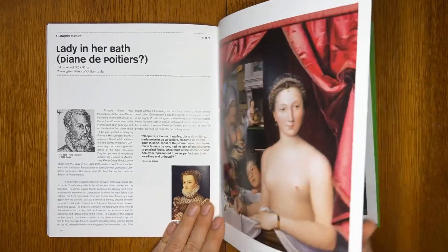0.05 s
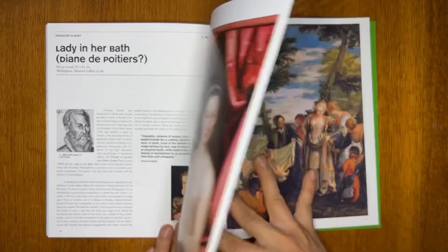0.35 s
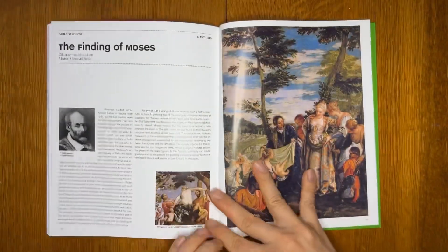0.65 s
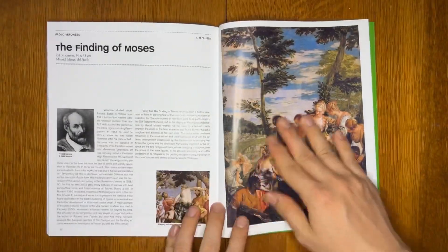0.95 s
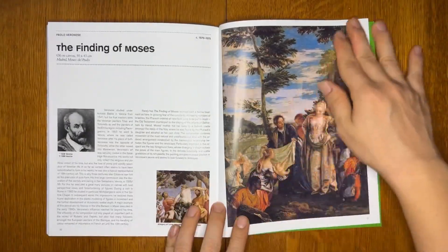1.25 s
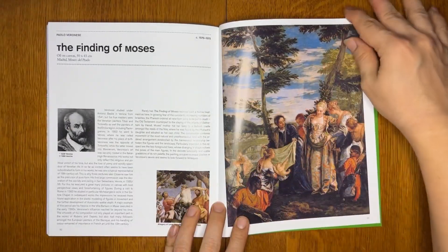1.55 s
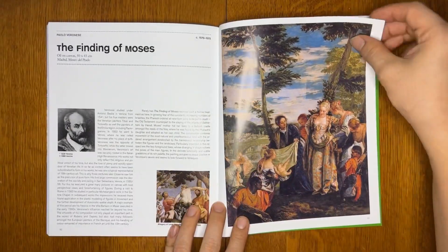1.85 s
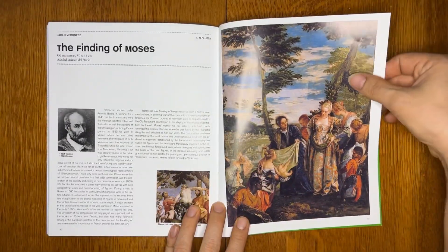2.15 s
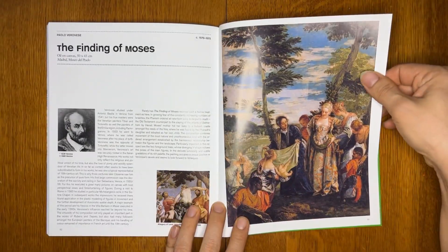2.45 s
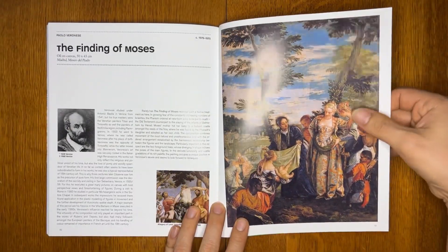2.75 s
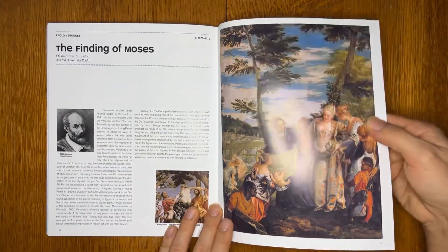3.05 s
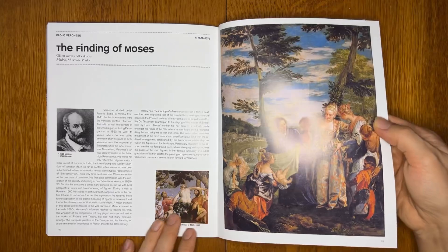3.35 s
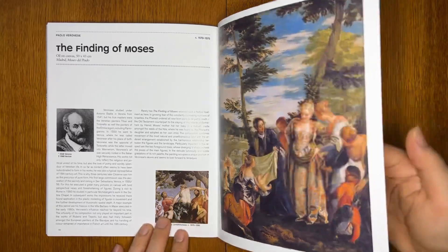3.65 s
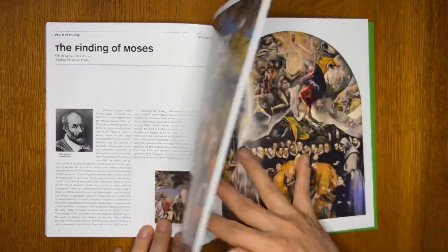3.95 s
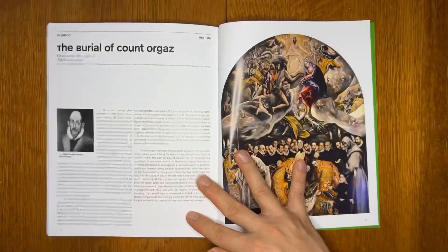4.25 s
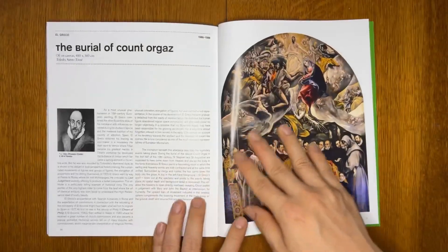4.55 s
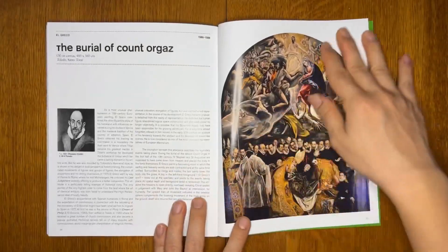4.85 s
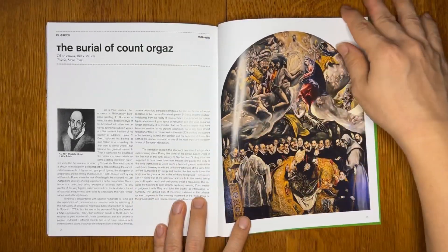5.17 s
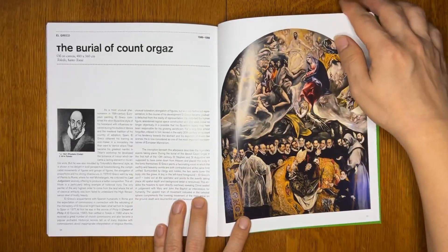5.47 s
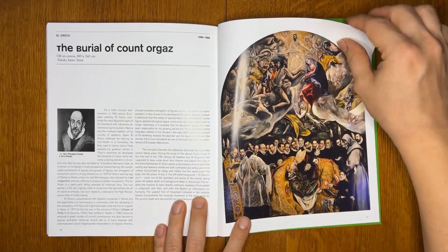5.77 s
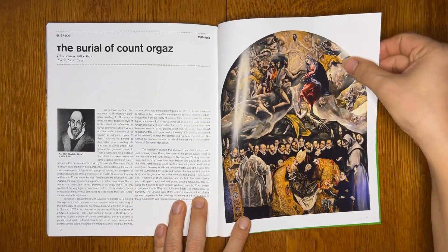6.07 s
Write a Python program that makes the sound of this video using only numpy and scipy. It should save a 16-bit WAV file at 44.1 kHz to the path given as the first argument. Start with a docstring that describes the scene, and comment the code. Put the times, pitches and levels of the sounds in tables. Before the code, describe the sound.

In a quiet room, a glossy book page turns with small crackles and a soft pat, and a palm smooths it with a gentle hiss. Fingers rub at the corner and lift the next sheet with light ticks. It buckles with one loud snap and a low thud, then slides over and lands softly. The hand smooths again and fingertips scratch at another corner, all heard up close.

```python
"""In a quiet room, at a wooden table, hands turn and smooth the glossy pages of a book.
Friction makes skin hiss on the coated paper and sheet slide on sheet, and drives the page to drum faintly.
The lifted page buckles with one loud snap and several small ones, each ringing its bending modes.
Edges tick and click, pages and fingers land with soft pats, and displaced air thuds the table."""
import sys
import numpy as np
from scipy import signal
from scipy.fft import rfft, irfft
from scipy.io import wavfile

SR = 44100
rng = np.random.default_rng(int(sys.argv[2]) if len(sys.argv) > 2 else 0)


def wav_out(sig):
    """Save sig, one row per channel (or a flat mono array), as 16-bit PCM at SR to the path in sys.argv[1]."""
    wavfile.write(sys.argv[1], SR, np.round(np.clip(np.atleast_2d(sig).T, -1, 1) * 32767).astype(np.int16))


N = 269451
TIME, BIN_HZ = np.arange(N) / SR, np.fft.rfftfreq(N, 1 / SR)
FREE_PAGE_HZ = 2142  # tone of a flap that has come wholly free

# spectrum of skin rubbing on coated paper: frequency_hz, density_db
SKIN_SPECTRUM = [(300, -37.5), (1500, -12.5), (3000, -5.5), (4300, -6), (6400, -6), (7800, -1), (9500, 0),
                 (12400, 2.3), (15800, 0)]
# a carried sheet drags over its neighbour: start_s, rise_s, hold_s, release_s, hiss_db, slide_db, drum_db
SHEET_DRAGS = [(0, 0.0013, 0.35, 0.42, -67, -66.5, -68), (0.537, 0.071, 0.071, 0.15, -62.5, -71.5, -73),
               (0.722, 0.0087, 0.076, 0.39, -82, -72.5, -66), (2.3, .12, 0.13, 0.13, -80, -62, -66),
               (2.615, 0.041, 0.029, 0.21, -74, -62, -65.5), (2.705, 0.13, 0.16, 0.26, -67.5, -66, -65),
               (3.02, 0.057, 0.18, 0.18, -64.5, -70.5, -67), (3.213, 0.06, 0.14, 0.059, -64.5, -78, -64.5),
               (3.428, 0.021, .1, 0.091, -77, -68, -62.5), (3.517, 0.02, 0.032, 0.062, -82, -70, -61.5),
               (3.641, 0.085, 0.081, 0.1, -74, -65, -65), (3.772, 0.12, 0.2, .07, -61, -67.5, -72.5)]
# a finger slides under the page: start_s, rise_s, hold_s, release_s, level_db, first_pitch_hz
FLAP_LIFTS = [(1.82, .17, .5, 0.25, -62.5, 6400), (2.27, 0.13, .08, 0.21, -55.8, 2348),
              (4.365, 0.035, 0.02, 0.05, -70, 3000), (5.84, 0.03, .22, .05, -66, 5700)]


def buckle(level_db, stiffness, corner_hz, freedom):
    """Snap-through rings the sheet's modes and sends out a crack of bending waves; fingers damp both."""
    # modes of the bowed, undamped sheet: pitch_hz, level_db, t60_s
    sheet_modes = [(198.6, -36, 0.4), (325.3, -29, 0.17), (414, -27, 0.18), (546, -19.5, 0.11),
                   (687.4, -2, 0.04), (795, 0, 0.065), (946, -11.5, 0.068), (1061, -12, 0.07),
                   (1107, -15.5, 0.072), (1337, -14.5, .07), (1550, -12.5, 0.035), (1781, -19, 0.09),
                   (2102, -11.5, 0.058), (2220, -17.5, 0.05), (2560, -23.5, 0.045)]
    mode_hz, mode_db, t60_s = np.transpose(sheet_modes)[:, :, None]
    t, freedom = np.arange(SR // 3) / SR, np.clip(freedom, 0.1, 1)
    hz, age = mode_hz * stiffness, t / freedom
    polarity = (-1) ** np.arange(len(sheet_modes))[:, None]  # neighbouring modes swing opposite ways
    modes = polarity * amp(mode_db - 60 * age / t60_s) * soften(hz, corner_hz)
    phases_rad = (0, polarity * 0.39)  # the wide sheet reaches left and right out of step
    ring = np.array([(modes * np.sin(2 * np.pi * hz * t + phase)).sum(0) for phase in phases_rad])
    crack_db = -6.75 + 5.5 * (1 - freedom)  # a held sheet cracks more than a free one
    crack = crack_noise(len(t), corner_hz) * amp(crack_db - 60 * age / 0.038)
    attack = 1 - np.exp(-(t * corner_hz / 0.67) ** 2)  # a duller snap starts more gently
    return amp(level_db - 4.5) * (ring + crack) * attack / np.sqrt(freedom)  # same energy, shorter ring


def crack_noise(size, corner_hz):
    """Bending waves of many frequencies superpose into a band of noise."""
    # spectrum of the crack: frequency_hz, density_db
    crack_spectrum = [(60, -27), (280, -17), (450, -6), (700, 3), (1300, 10), (1700, 9), (2600, -1),
                      (3700, -13), (4600, -24), (15000, -24)]
    return colour(white(size), crack_spectrum, corner_hz)


def snaps():
    """Elastic instability: the bent sheet buckles in clear snaps, and in faint stray ones as it drags."""
    # buckles: start_s, level_db, stiffness (pitch factor), corner_hz, freedom (share of ring time left)
    buckles = [(0.5962, -46, 0.6, 1300, 0.54), (.6185, -38.5, 0.615, 1800, 0.3),
               (.6265, -47, 0.89, 1790, 0.5), (0.6467, -45, 0.63, 2640, 0.24),
               (0.757, -47, 0.89, 3000, 0.3), (1.0, -48.5, 1.23, 2000, 0.64),
               (1.4143, -47, 1.1, 1490, 0.86), (1.542, -48, 1.16, 2480, 0.4),
               (1.8365, -35, 1.28, 3000, 0.17), (3.0312, -28, 0.81, 1500, 0.74),
               (3.0373, -22, 1.12, 2000, 0.6), (3.0422, -27, 0.87, 1400, .4), (3.0578, -29, 1, 1900, 0.5),
               (3.0478, -13, 1, 2300, 0.9), (3.1055, -35, 0.92, 2500, 0.4), (3.1185, -43, 1.1, 2000, .3),
               (3.127, -44, 1.2, 2200, .3), (3.173, -46, 1.05, 2400, .3), (3.211, -42, 0.71, 3500, 0.38),
               (3.2733, -38, 0.92, 3470, 0.37), (3.3955, -47.5, 0.88, 2390, 0.27),
               (3.428, -43, 0.94, 2600, 0.53), (3.6513, -59, 0.96, 1800, 0.8),
               (3.7797, -50, 1.01, 3200, 0.43), (3.8025, -49, 1.03, 3000, 0.54),
               (4.0975, -44.5, 1.1, 2200, 0.25), (4.135, -48, 1.01, 2606, 0.17),
               (5.1569, -51, 1.23, 3000, 0.5), (5.1866, -49.5, 0.96, 2600, 0.4),
               (5.330, -56.5, 1.18, 1507, 0.76), (5.509, -61.5, 1.13, 2600, 0.66),
               (5.905, -50, 1.19, 2620, 0.72)]
    out = np.zeros((2, N))
    for start_s, *settings in buckles:
        add(out, start_s, buckle(*settings))
    for start_s, rise_s, hold_s, *_ in SHEET_DRAGS:
        for chance, place, size in rng.random((4, 3)):
            if chance < hold_s:  # on average four strays per second of steady dragging
                stray = buckle(-62 + 4 * size, stiffness=1.05, corner_hz=2400, freedom=0.45)
                add(out, start_s + rise_s + place * hold_s, stray)
    return out


def settling(start_s=3.055, level_db=-49, t60_s=0.8):
    """Stress relaxation: after the loud snap the taut sheet crackles until it has settled."""
    # spectrum of the crackle: frequency_hz, density_db
    spectrum = [(100, -12.5), (450, -4), (650, -1), (800, -4), (1100, -1), (1550, -3), (1850, -13.5),
                (2700, -11), (4000, -15), (6000, -26.5), (12000, -42)]
    age = np.maximum(TIME - start_s, 0)
    crackle = friction(spectrum, slips_per_s=700, spread_db=1.8, grain=0.55, waver_db=1, waver_hz=30)
    window = stroke(age, rise_s=0.007, hold_s=0.13, release_s=0.089)
    return crackle * amp(level_db - 60 * age / t60_s) * window


def friction(spectrum, slips_per_s, spread_db, grain, waver_db, waver_hz):
    """Stick-slip: tiny slips blur to a hiss, larger ones stand out as grain, and the pressure wavers."""
    sizes = amp(spread_db * np.minimum(rng.exponential(1, N), 4))
    slips = sizes * (rng.random(N) < slips_per_s / SR)
    drive = np.sqrt(grain) * unit(slips * white(N)) + np.sqrt(1 - grain) * white(N)
    return colour(drive, spectrum) * amp(waver_db * waver(waver_hz))


def rubbing():
    """Friction noise of skin and paper grows with sliding speed; incoherent sources add in power."""
    # the flat hand smooths the page: start_s, rise_s, hold_s, release_s, hiss_db
    sweeps = [(0.66, 0.42, 0.2, .27, -51.3), (4.24, 0.55, 0.05, 0.29, -51)]
    # fingers feel for the corner: start_s, rise_s, hold_s, release_s, hiss_db, slide_db, tip_share
    rubs = [(1.467, 0.053, 0.02, 0.016, -63.5, -62.5, 1), (1.735, 0.0072, 0.055, 0.051, -60.5, -67.5, 1),
            (1.77, 0.07, 0.068, 0.083, -55, -63.5, 1), (1.903, 0.097, 0.056, 0.24, -56.5, -63, 0.97),
            (2.26, 0.16, 0.16, 0.38, -63, -69, 1), (2.83, 0.18, 0.0049, 0.11, -61.5, -58, 0),
            (3.457, 0.057, 0.026, 0.05, -61, -69.5, 0.1), (4.048, 0.043, .005, 0.021, -56.5, -79, 0.3),
            (4.096, 0.028, 0.0082, 0.028, -58, -58.5, .1), (5.179, 0.0066, 0.049, 0.08, -53.5, -67.5, 0.6),
            (5.295, 0.073, 0.017, 0.1, -63.5, -74.5, 0.54), (5.492, 0.098, 0.0054, 0.075, -68, -76.5, 0.6),
            (5.666, 0.038, 0.0047, .05, -74, -79.5, 0.57), (5.762, 0.012, 0.31, .1, -56, -66.5, 1),
            (5.831, 0.041, 0.0045, 0.046, -47.5, -58.5, 0.95),
            (6.004, 0.038, .005, 0.065, -53.5, -60.5, 0.96)]
    # spectra of a fingertip, of sheet on sheet and of the drumming page: frequency_hz, density_db
    tip_spectrum = [(300, -35), (1500, -12.5), (3000, -13), (4300, -4), (6800, -3.5), (7800, 4.5),
                    (10200, 0), (12300, 3), (13600, -3), (15800, -7)]
    slide_spectrum = [(200, -31.5), (600, -6), (1100, -9), (1700, -2.5), (2020, 3), (2300, -2), (3200, -4),
                      (4500, -13.5), (5600, -11), (7000, -17), (15000, -34)]
    drum_spectrum = [(150, -27), (450, -22), (650, -6), (800, 0), (950, 0), (1200, -4.5), (1700, -10),
                     (4000, -45)]
    powers = np.zeros((4, N))
    palm, tips, slide, drum = powers
    for start_s, *timing, hiss_db in sweeps:
        speed = stroke(TIME - start_s, *timing)
        palm += (amp(hiss_db) * speed) ** 2
        slide += (amp(hiss_db - 19.5) * speed ** 1.37) ** 2
    for start_s, *timing, hiss_db, slide_db, tip_share in rubs:
        speed = stroke(TIME - start_s, *timing)
        palm += (1 - tip_share) * (amp(hiss_db) * speed) ** 2
        tips += tip_share * (amp(hiss_db) * speed) ** 2
        slide += (amp(slide_db) * speed) ** 2
        drum += (amp(slide_db - 8.5) * speed) ** 2
    for start_s, *timing, hiss_db, slide_db, drum_db in SHEET_DRAGS:
        speed = stroke(TIME - start_s, *timing)
        palm += (amp(hiss_db) * speed) ** 2
        slide += (amp(slide_db) * speed) ** 2
        drum += (amp(drum_db) * speed) ** 2
    noises = [
        friction(SKIN_SPECTRUM, slips_per_s=2600, spread_db=1.5, grain=0.25, waver_db=0, waver_hz=25),
        friction(tip_spectrum, slips_per_s=1800, spread_db=2, grain=0.13, waver_db=1, waver_hz=17),
        friction(slide_spectrum, slips_per_s=1300, spread_db=-0.5, grain=0.51, waver_db=0.9, waver_hz=14),
        friction(drum_spectrum, slips_per_s=230, spread_db=1, grain=0.14, waver_db=0.5, waver_hz=20)]
    return sum(np.sqrt(power) * noise for power, noise in zip(powers, noises))


def resonance(pitch_hz, width_hz):
    """A resonator driven by friction passes a band of noise centred on its moving pitch."""
    pole = np.exp(-np.pi * width_hz / SR)
    baseband = signal.lfilter([1], np.poly([pole, pole]), white(len(pitch_hz)))
    carrier = np.exp(2j * np.pi * np.cumsum(pitch_hz) / SR)
    return colour((baseband * carrier).real, [(500, -11.5), (1500, -2), (8000, -1.5)])


def drumming():
    """Forced vibration: the bowed page drums under the palm, a little lower when the hand is slow."""
    # the palm crosses the page: start_s, rise_s, hold_s, release_s, level_db, full_speed_pitch_hz
    crossings = [(0.7, .24, .14, .38, -62, 930), (4.42, .28, .06, .3, -64, 990)]
    out = np.zeros((2, N))
    for start_s, *timing, level_db, top_hz in crossings:
        _, speed = gesture(timing)
        pitch_hz = top_hz * (1 - 0.05 * (1 - speed))
        add(out, start_s, amp(level_db) * speed * resonance(pitch_hz, width_hz=400))
    return out


def judders():
    """Stick-slip of a gripping fingertip briefly excites one narrow resonance of the page."""
    # the fingertip grips: start_s, rise_s, hold_s, release_s, level_db, pitch_hz
    grips = [(1.935, .012, .01, .015, -66, 860), (3.545, .012, .02, .025, -61.5, 900),
             (5.372, .01, .006, .015, -65, 900), (5.978, .008, .006, .012, -63, 820)]
    out = np.zeros((2, N))
    for start_s, *timing, level_db, pitch_hz in grips:
        t, speed = gesture(timing)
        add(out, start_s, amp(level_db) * speed * resonance(np.full(len(t), pitch_hz), width_hz=240))
    return out


def flaps(freeing_s=0.16):
    """A larger plate resonates lower, so a lifted flap sinks in tone as more of it comes free."""
    out = np.zeros((2, N))
    for start_s, *timing, level_db, first_hz in FLAP_LIFTS:
        t, speed = gesture(timing)
        pitch_hz = FREE_PAGE_HZ + (first_hz - FREE_PAGE_HZ) * np.exp(-t / freeing_s)
        add(out, start_s, amp(level_db) * speed * resonance(pitch_hz, width_hz=1640))
    return out


def hollows():
    """Cavity resonance: the hollow between hand and page glides in pitch as its size changes."""
    # the hollow rings: start_s, rise_s, hold_s, release_s, level_db, first_pitch_hz, last_pitch_hz
    glides = [(0.715, 0.14, 0.059, 0.23, -70, 2586, 3300), (1.118, 0.2, .1, 0.07, -76, 2840, 2130),
              (4.548, 0.17, .18, 0.24, -73, 2890, 2110)]
    out = np.zeros((2, N))
    for start_s, *timing, level_db, first_hz, last_hz in glides:
        t, speed = gesture(timing)
        pitch_hz = np.linspace(first_hz, last_hz, len(t))
        add(out, start_s, amp(level_db) * speed * resonance(pitch_hz, width_hz=900))
    return out


def flexing(sound, depth_db, patch_hz, patch_s):
    """Bending shifts the sheet's many small resonances, so spectral peaks come and go in the friction."""
    hz, t, spectra = signal.stft(sound, SR, nperseg=1024, noverlap=768)
    field = rng.standard_normal((len(t), len(hz))).T
    for axis, step in enumerate((hz[1] / patch_hz, t[1] / patch_s)):  # smooth over frequency, then time
        pole = np.exp(-step)
        field = signal.lfilter([1], np.poly([pole, pole]), field, axis=axis)
    gain = unit(amp(depth_db * np.clip(unit(field), -3, 3)))
    return signal.istft(spectra * gain, SR, nperseg=1024, noverlap=768)[1][:, :N]


def edge_tick(level_db, pitch_hz, t60_s=0.0135):
    """Damped free vibration: the stiff edge of the sheet rings briefly after a flick."""
    # modes of the edge: pitch_ratio, level_db
    edge_modes = [(.68, -12), (1, -0.5), (1.25, -6.5)]
    ratio, mode_db = np.transpose(edge_modes)[:, :, None]
    t = np.arange(SR // 30) / SR
    ring = (amp(mode_db - 60 * t / t60_s) * np.sin(2 * np.pi * pitch_hz * ratio * t)).sum(0)
    attack = 1 - np.exp(-t * pitch_hz / 2)
    return amp(level_db) * np.array([ring, ring]) * attack


def ticks(crackles_per_s=70):
    """Plucking: the edge flicks off a finger or a sheet, singly or in a crackle under a lifted flap."""
    # single flicks: start_s, level_db, pitch_hz
    flicks = [(2.032, -42, 2540), (2.384, -44, 2500), (2.422, -42, 2430), (3.781, -43, 2400),
              (4.406, -52, 2500), (4.4365, -47, 2550)]
    out = np.zeros((2, N))
    for start_s, level_db, pitch_hz in flicks:
        add(out, start_s, edge_tick(level_db, pitch_hz))
    for start_s, *timing, lift_db, _ in FLAP_LIFTS:
        length_s = sum(timing)
        for place, weakness, octave in rng.random((round(crackles_per_s * length_s), 3)):
            tick = edge_tick(lift_db + 7.5 - 10 * weakness, FREE_PAGE_HZ * 2 ** (octave - 1 / 3))
            add(out, start_s + place * length_s, stroke(place * length_s, *timing) * tick)
    return out


def clicks(t60_s=0.011):
    """A short impulse has a wide spectrum: a caught edge lets go with a dry click."""
    # the edge lets go: start_s, level_db
    releases = [(.6465, -54), (.756, -55), (3.2112, -47), (3.2137, -46), (3.2735, -52), (4.098, -51),
                (4.4372, -54), (4.464, -58), (5.1545, -56), (5.184, -51), (5.449, -64), (5.509, -64)]
    # spectrum of a click: frequency_hz, density_db
    click_spectrum = [(300, -16), (1200, -1), (2500, 5), (5000, -5), (8000, -1), (15800, 2)]
    out, t = np.zeros((2, N)), np.arange(SR // 30) / SR
    for start_s, level_db in releases:
        add(out, start_s, colour(white(len(t)), click_spectrum) * amp(level_db - 60 * t / t60_s))
    return out


def pats():
    """Soft impact: a landing swells as the contact spreads, then dies, with a scuff of hiss on top."""
    # a page or finger lands: start_s, level_db, rise_s, t60_s, corner_hz, scuff_db (relative to the pat)
    landings = [(.598, -52.5, 0.023, 0.18, 1090, -24), (.645, -58, 0.0012, 0.075, 2500, 4),
                (0.753, -53.5, 0.0022, 0.09, 2530, -6), (0.773, -62, 0.0018, 0.13, 600, 3),
                (1.525, -59.5, 0.0048, 0.21, 2360, -11), (1.837, -52.5, 0.002, 0.14, 2500, -13),
                (2.2983, -60.5, .001, 0.056, 5000, -8), (4.123, -55, 0.0091, 0.17, 2510, -10),
                (4.169, -62.5, 0.00197, 0.13, 450, -15), (4.213, -61, 0.0014, 0.28, 686, -11.5),
                (5.153, -57, 0.0041, 0.12, 2400, 4.5), (5.184, -55.5, 0.0014, 0.25, 1500, -3),
                (5.903, -53.5, 0.0076, 0.069, 2200, -8)]
    # spectrum of a pat before softening: frequency_hz, density_db
    pat_spectrum = [(30, -18), (70, -15), (200, -5), (480, -0.5), (900, 3), (1500, -5.5), (3000, -4.5),
                    (15000, 9)]
    out, t = np.zeros((2, N)), np.arange(SR // 3) / SR
    for start_s, level_db, rise_s, t60_s, corner_hz, scuff_db in landings:
        envelope = np.minimum(t / rise_s, 1) * amp(level_db - 60 * np.maximum(t - rise_s, 0) / t60_s)
        impact = colour(white(len(t)), pat_spectrum, corner_hz)
        scuff = amp(scuff_db) * colour(white(len(t)), SKIN_SPECTRUM)
        add(out, start_s, envelope * (impact + scuff))
    return out * amp([[-0.5], [0.5]])  # slightly to the right


def puffs(rise_s=0.014):
    """A pressure pulse of air, squeezed out by a turning page, excites the low modes of book and table."""
    # thuds of air: start_s, level_db, t60_s
    thuds = [(.768, -57, 0.16), (1.42, -60, 0.15), (1.843, -62, 0.28), (3.044, -40.5, 0.24),
             (3.49, -63, 0.18), (4.159, -61, 0.23)]
    # modes of book and table: pitch_hz, level_db
    table_modes = [(57, -3), (81, -7), (122, -9), (158, -10.5)]
    out, t = np.zeros((2, N)), np.arange(SR // 2) / SR
    mode_hz, mode_db = np.transpose(table_modes)[:, :, None]
    ring = (amp(mode_db) * np.sin(2 * np.pi * mode_hz * t)).sum(0) * np.minimum(t / rise_s, 1)
    for start_s, level_db, t60_s in thuds:
        add(out, start_s, np.array([ring, ring]) * amp(level_db - 60 * t / t60_s))
    return out


def handling():
    """Structure-borne sound: book and table rumble faintly as the hands move."""
    # course of the rumble: time_s, level_db
    levels = [(0, -66.5), (.2, -75.5), (1.1, -74), (1.65, -76), (1.9, -74.5), (3.1, -70.5), (4.15, -77.5),
              (4.4, -83.5), (6.11, -85)]
    # spectrum of the rumble: frequency_hz, density_db
    rumble_spectrum = [(20, -24), (40, -1.5), (58, 1), (100, -0.5), (160, -7.5), (197, 3), (250, -13.5),
                       (500, -9.5), (1500, -22.5)]
    rumble = colour(white(N), rumble_spectrum)
    return rumble * amp(np.interp(TIME, *np.transpose(levels)) + 0.73 * waver(9))


def room(sound, onset_s=0.0099):
    """Reverberation: a diffuse tail builds up quickly and decays at its own rate in each band."""
    # reverberation times: frequency_hz, t60_s
    decay_times = [(100, 0.28), (700, 0.2), (1500, 0.38), (4000, 0.18), (12000, 0.14)]
    # spectrum of the reflections: frequency_hz, density_db
    spectrum = [(60, 10.5), (550, 12), (800, 11), (1200, 9.5), (2500, 12), (15000, -10.5)]
    hz, t, bands = signal.stft(colour(white(SR), spectrum), SR, nperseg=256)
    bands = bands * amp(-60 * t / read(decay_times, hz)[:, None]) * np.minimum(t / onset_s, 1)
    tail = signal.istft(bands, SR, nperseg=256)[1]
    return signal.fftconvolve(sound, tail / np.linalg.norm(tail[0]), axes=1)[:, :N]


def still_air():
    """Ambient noise: the quiet room has a steady, mostly low noise floor."""
    # spectrum of the noise floor: frequency_hz, density_db
    air_spectrum = [(20, -38.5), (60, 0), (150, 0), (300, -4.5), (900, -20.5), (2000, -8.5), (3200, -20),
                    (5000, -21.5), (8000, -18), (15500, -19)]
    return colour(white(N), air_spectrum)


def colour(pair, spectrum, corner_hz=np.inf):
    """Partial coherence: two unrelated signals become one filtered sound of rms 1 at spaced microphones."""
    # likeness of the two channels: frequency_hz, coherence
    coherences = [(60, .98), (200, .87), (700, .85), (1400, .8), (2400, .92), (3200, .7), (4500, .55),
                  (5700, .15), (7200, .92), (8300, .85), (9500, .99), (10700, .85), (12000, .97),
                  (13200, .85), (14400, .99), (15800, .7)]
    # level difference: frequency_hz, left_minus_right_db
    balances = [(100, 0), (700, -0.5), (1400, 2), (2400, 0.3), (3500, -1.5), (5600, -7.5), (6900, -.6),
                (15000, 0)]
    # phase difference: frequency_hz, left_lead_rad
    leads = [(60, 0), (1700, .25), (2500, -.1), (3600, -.95), (4600, -.45), (7200, 0), (8200, .7),
             (9300, 3), (9900, 3.3), (11200, 6), (12600, 6.5), (13900, 9.2), (14800, 9.6), (15800, 11.2)]
    hz = np.fft.rfftfreq(pair.shape[1], 1 / SR)
    first, second = rfft(pair)
    coherence = read(coherences, hz)
    mid, side = first * np.sqrt(1 + coherence), second * np.sqrt(1 - coherence)
    lean, lag = amp(read(balances, hz) / 2), np.exp(-1j * read(leads, hz))
    stereo = np.array([(mid + side) * lean, (mid - side) * lag / lean])
    shape = amp(read(spectrum, hz)) * soften(hz, corner_hz)
    return unit(irfft(stereo * shape, pair.shape[1]))


def stroke(t, rise_s, hold_s, release_s):
    """Trapezoidal envelope, 0-1, like the speed of a hand: it gathers pace, holds and slows to rest."""
    return np.clip(np.minimum(t / rise_s, 1 - (t - rise_s - hold_s) / release_s), 0, 1)


def gesture(timing):
    """Time axis and speed of one stroke with the given rise_s, hold_s, release_s."""
    t = np.arange(0, sum(timing), 1 / SR)
    return t, stroke(t, *timing)


def soften(hz, corner_hz):
    """Low-pass gain: a soft contact passes little above its corner."""
    return 1 / np.sqrt(1 + (hz / corner_hz) ** 4)


def waver(corner_hz):
    """Low-passed noise gives a slow random fluctuation of rms 1."""
    return unit(irfft(rfft(rng.standard_normal(N)) * soften(BIN_HZ, corner_hz), N))


def white(size):
    """Two uncorrelated white noises."""
    return rng.standard_normal((2, size))


def amp(db):
    """Decibels to amplitude ratio."""
    return 10 ** (np.asarray(db) / 20)


def unit(x):
    """Normalises to rms 1."""
    return x / np.sqrt(np.mean(x ** 2) + 1e-20)


def read(points, hz):
    """Interpolates a table along log frequency."""
    point_hz, value = np.transpose(points)
    return np.interp(np.log(hz + 1), np.log(point_hz + 1), value)


def add(mix, start_s, sound):
    """Superposes a stereo sound on the mix from start_s."""
    part = mix[:, round(start_s * SR):][:, :sound.shape[1]]
    part += sound[:, :part.shape[1]]


def scene():
    """Superposition of the book's direct sound, weak reverberation and the noise floor."""
    sliding = rubbing() + drumming() + judders() + flaps() + hollows()
    sliding = flexing(sliding, depth_db=3, patch_hz=70.2, patch_s=0.024)
    book = sliding + handling() + snaps() + ticks() + clicks() + settling() + pats() + puffs()
    return book + amp(-22) * room(book) + amp(-78.5) * still_air()


def record(dry):
    """Band limiting: a high-pass and a steep low-pass remove the deepest bass and the highest treble."""
    low_cut_hz, high_cut_hz = 26, 15900
    highpass = signal.butter(3, low_cut_hz, "highpass", fs=SR, output="sos")
    lowpass = signal.firwin(511, high_cut_hz, window=("kaiser", 9), fs=SR)
    return signal.oaconvolve(signal.sosfilt(highpass, dry), lowpass[None], "same")


dry = scene()
out = record(dry)
wav_out(out)
```